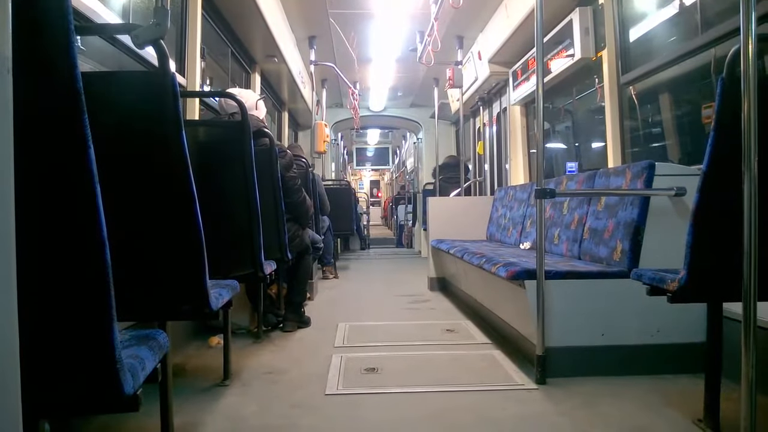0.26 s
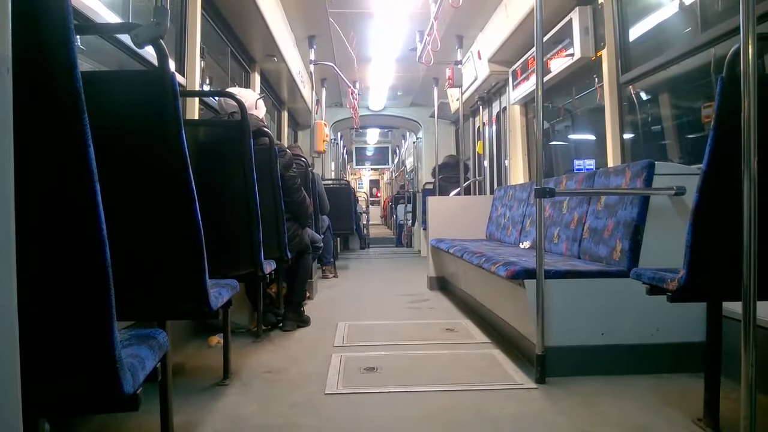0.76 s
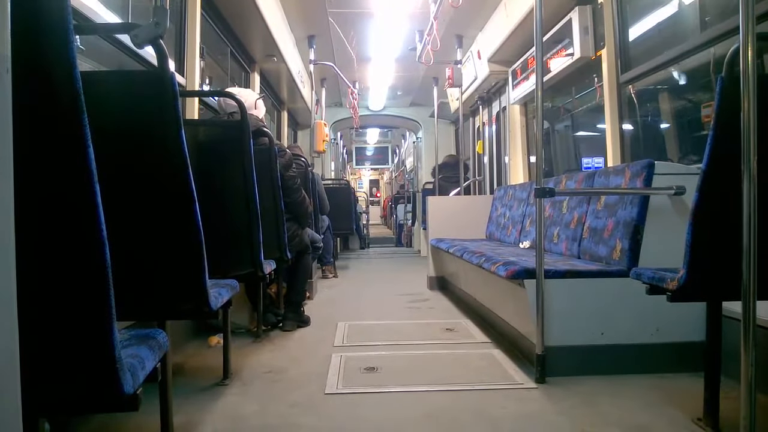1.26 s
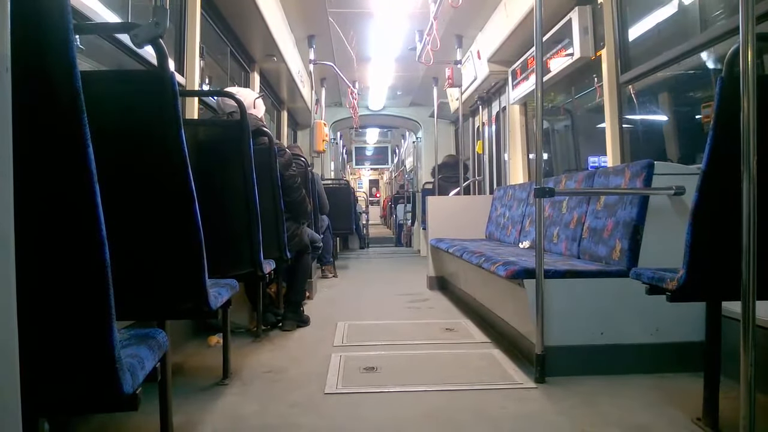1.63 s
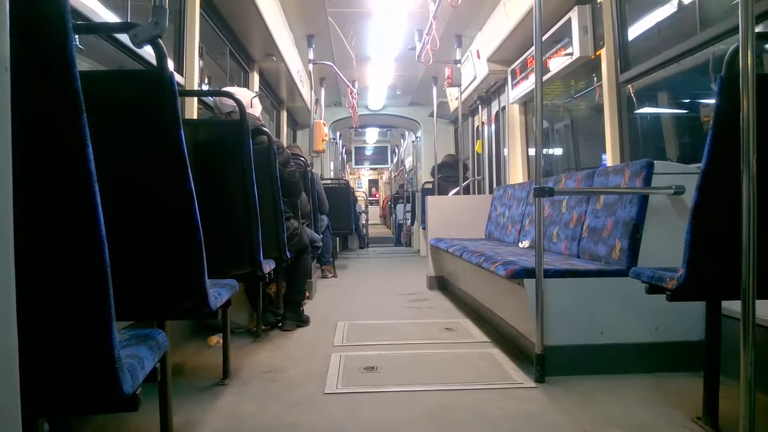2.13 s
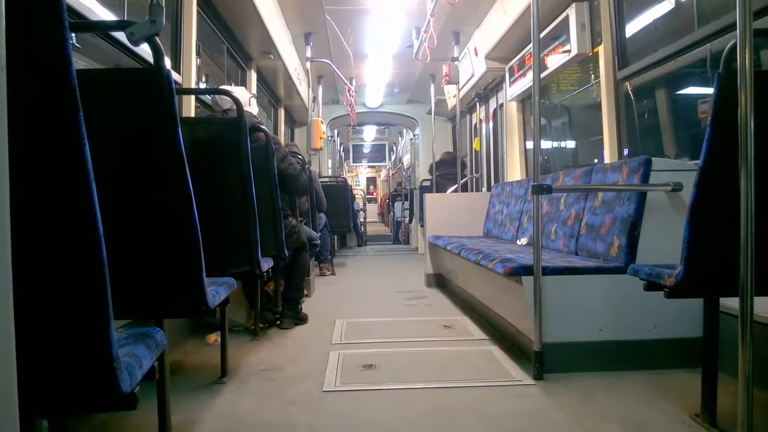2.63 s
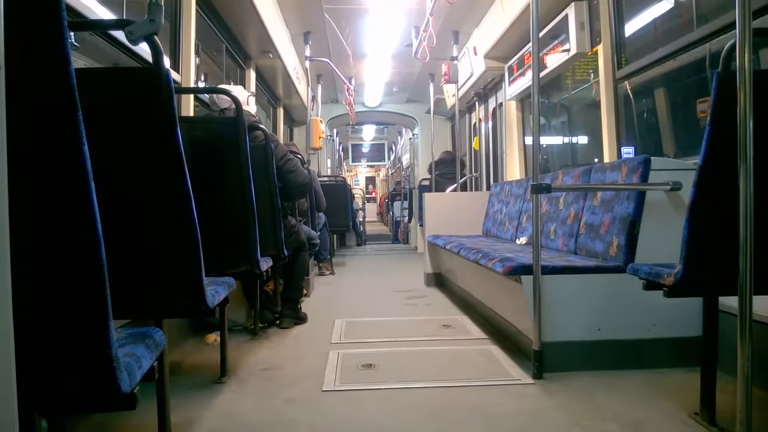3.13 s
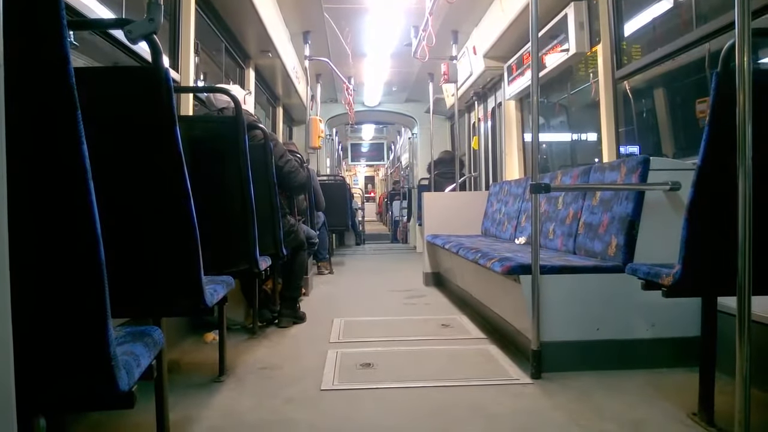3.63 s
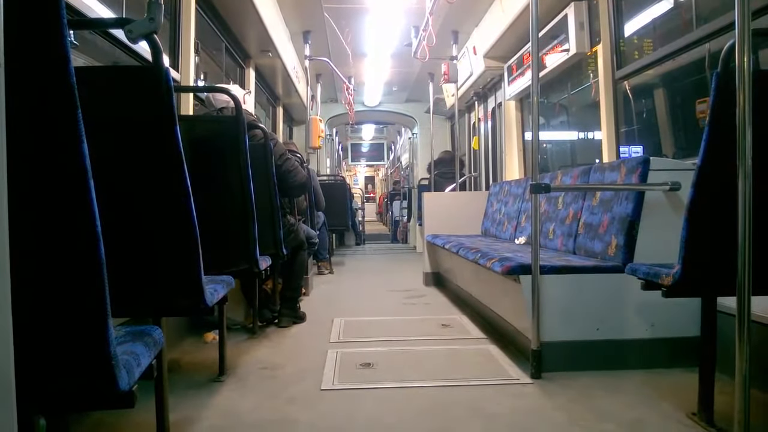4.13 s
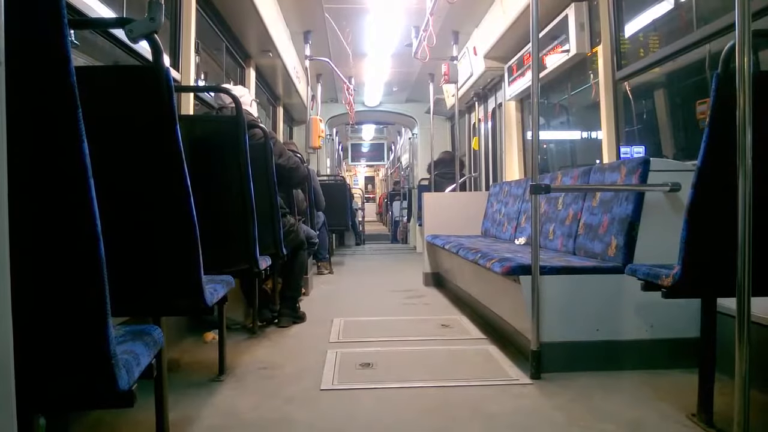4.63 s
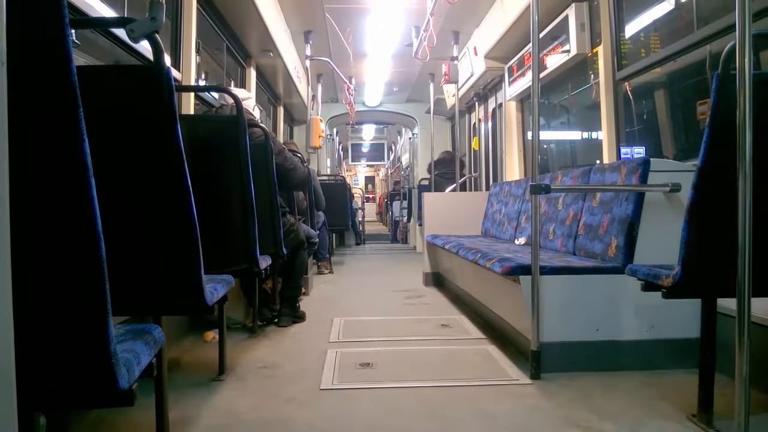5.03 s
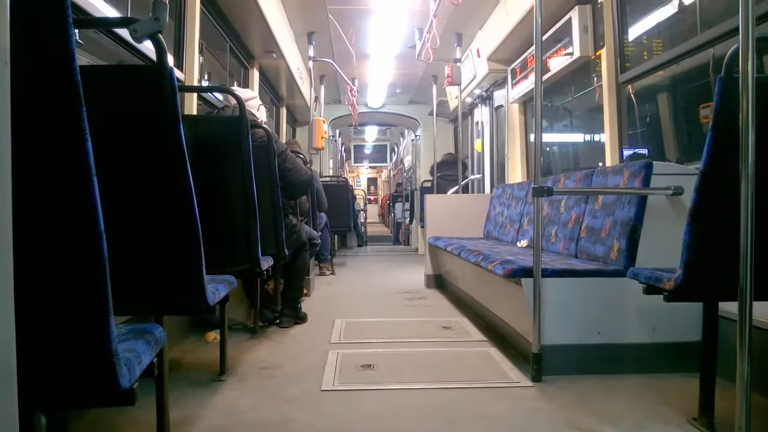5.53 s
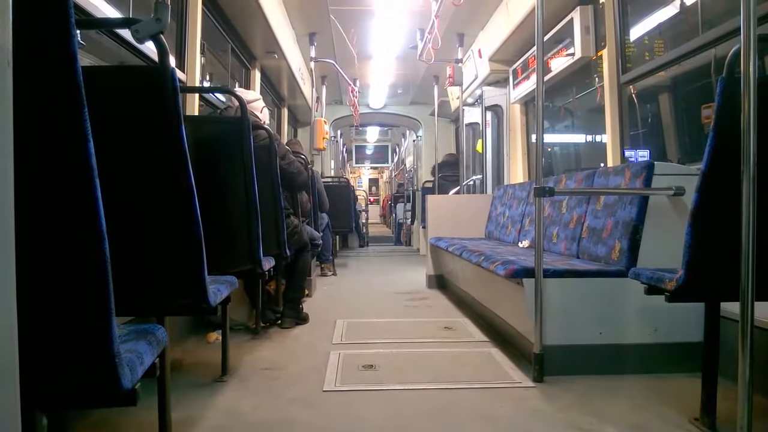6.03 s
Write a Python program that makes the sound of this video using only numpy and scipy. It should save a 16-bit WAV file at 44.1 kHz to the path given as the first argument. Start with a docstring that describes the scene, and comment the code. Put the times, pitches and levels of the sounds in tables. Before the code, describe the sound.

Inside a moving tram, wheels rumble and throb over a steady electric hum, then loose fittings clack and the floor thuds.

```python
"""Inside a slowing tram. From the start the wheels drum the car body and rumble on the rails, under
converter hum and motor whine. The drumming slows and dies away at a jolt near 2.6 s, just after a loose
part ticks. From 4.2 s the floor and seats thud harder and fittings clack more often on the right.
The brakes sing faintly; near 5 s a jolt brings the drumming back briefly and a panel groans once.
The rolling turns brighter, and more jolts and clacks close the scene."""
import sys
import numpy as np
from scipy import signal
from scipy.fft import rfft, irfft, next_fast_len
from scipy.io import wavfile
from scipy.ndimage import uniform_filter1d, map_coordinates

SR = 44100
rng = np.random.default_rng(int(sys.argv[2]) if len(sys.argv) > 2 else 0)


def wav_record(signal):
    """Record a signal, one row per channel, as 16-bit PCM in the file named by sys.argv[1]."""
    frames = np.transpose(np.atleast_2d(signal))
    bounded = np.clip(frames, -1, 1)
    # unit amplitude maps onto the largest positive 16-bit level
    quanta = np.round(bounded * 32767).astype(np.int16)
    wavfile.write(sys.argv[1], SR, quanta)


N = 276936
TIME = np.arange(N) / SR
PAD = 4096  # samples of room for filters to ring


# pace of the wheel bumps: (time [s], rate [Hz])
DRUM_PACE = [(0, 17.1), (1.5, 16.9), (2.6, 15.6), (4.9, 17.1)]
# fader of the drumming: (time [s], level [dB])
DRUM_FADER = [(0.0, -16.5), (0.35, -11), (0.639, -9), (1.05, -11), (1.75, -8.5), (2.25, -14), (2.699, -36),
              (2.85, -69), (4.93, -72), (5.07, -21.5), (5.28, -21), (5.5, -58.5)]
# its fixed harmonics: (multiple, gain [dB])
DRUM_HARMONICS = [(1, 0.5), (2, -16), (4, -28.5)]
# its third harmonic, fading early: (time [s], gain [dB])
DRUM_THIRD_FADER = [(0, -10.5), (0.65, -18), (0.9, -29)]

def body_drumming():
    """The car body drums once per wheel bump: a deep throb."""
    (hz,), (db,), (third_db,) = curves(DRUM_PACE), curves(DRUM_FADER), curves(DRUM_THIRD_FADER)
    return centred(amp(db) * harmonics(hz, DRUM_HARMONICS + [(3, third_db)]))


# bed of floor shake: (time [s], level [dB])
SHAKE_FADER = [(0, -28.5), (2, -25.5), (2.5, -18), (3.4, -27.5), (4.5, -32), (6.28, -37.5)]
# track jolts: (time [s], level [dB], hold [s])
TRACK_JOLTS = [(0, -16.5, 0.049), (2.62, -21, 0.34), (4.22, -30, 0.044), (4.74, -25.5, 0.028),
               (4.974, -16, 0.23), (5.421, -22, 0.2), (5.912, -24.5, 0.16)]
# sub-bass of the floor: (frequency [Hz], gain [dB])
FLOOR_EQ = [(7.6, -39.5), (13, 1), (18, 1.5), (26, -2), (36, 0.5), (56, -6), (80, -30), (112, -16.5),
            (140, -50), (240, -120)]

def floor_shake():
    """The floor shakes all along; each track jolt swells it, holds and dies away."""
    rise_s, t60_s = 0.019, 0.93
    power = amp(curves(SHAKE_FADER)[0]) ** 2
    for start, db, hold in TRACK_JOLTS:
        attack = np.clip((TIME - start) / rise_s + 1, 0, 1)
        power += (attack * amp(db - 60 * np.maximum(TIME - start - hold, 0) / t60_s)) ** 2
    return np.sqrt(power) * noise_bed(FLOOR_EQ, patchy_db=-1.5)


# two-band fader of the rolling: (time [s], bass gain [dB], treble gain [dB])
ROLL_FADERS = [(0.0, -30.5, -36.5), (1, -32, -36.5), (1.8, -29.5, -36), (2.2, -35.5, -38),
               (3.69, -36.5, -37.5), (4.6, -39, -33), (5.05, -34, -30.5), (5.3, -34, -26),
               (5.8, -32.5, -30), (6.28, -34.5, -29)]
# rumble of wheel on rail: (frequency [Hz], gain [dB])
RAIL_EQ = [(41, -24.5), (70, -3), (92, -13.5), (112, -13.5), (156, -4), (179, -15.5), (218, -9.5),
           (253, -18), (290, -14), (464, -19), (647, -26.5), (1130, -32.5), (1300, -35), (1460, -32),
           (1600, -42.5), (2600, -59.5), (5720, -120)]

def rolling():
    """Wheels rumble on the rails, bass and treble swelling separately."""
    crossover_hz = 234
    bass_db, treble_db = curves(ROLL_FADERS)
    wheels = noise_bed(RAIL_EQ, patchy_db=1.5)
    bass = filtered_bed(wheels, lambda f: 1 / (1 + (f / crossover_hz) ** 2))
    treble = wheels - bass
    return amp(bass_db + 0.3 * wobble(5.3)) * bass + amp(treble_db + 0.25 * wobble(5.0)) * treble


# bumps of the car body: (time [s], gain [dB], ring pitch [Hz], ring boost [dB])
THUD_CUES = [(0.438, -36.5, 464, 7), (0.691, -37, 334, 11.5), (1.625, -36.5, 477, 12.5),
             (2.605, -30.5, 470, 2), (2.645, -31.5, 740, 7), (2.691, -29.5, 200, 11.5),
             (3.216, -40.5, 294, 1.5), (3.605, -34.5, 450, 7), (4.061, -40, 404, 5), (4.316, -17, 330, 5.5),
             (4.34, -23, 920, 12), (4.612, -29, 296, 13.5), (5.045, -32, 610, -2), (5.44, -31, 440, 3),
             (5.57, -24, 201, 16), (5.669, -32, 960, 10.5)]
# dull tone of floor and seat shells: (frequency [Hz], gain [dB])
SHELL_EQ = [(120, -31.5), (200, -4.5), (270, -1), (400, -0.5), (610, -3.5), (690, -10), (1000, -12.5),
            (2000, -30.5), (4500, -97)]

def thuds():
    """Dull bumps come through floor and seats; the shells ring on their modes."""
    rise_s, hold_s = 0.0048, 0.017
    modes_hz, width_hz = [271, 389.6, 461, 570, 975], 22
    track = np.zeros((2, N + SR))
    for start, db, hz, ring_db in THUD_CUES:
        contacts = burst(rise_s, hold_s, kick=0.095)
        bump = struck(contacts, hold_s, SHELL_EQ, hz, ring_db, width_oct=0.37)
        track[:, round(start * SR):][:, :bump.shape[1]] += amp(db) * bump
    modes = lambda f: 1 + sum(1 / (1 + 2j * (f - hz) / width_hz) for hz in modes_hz)
    return amp(-2.5) * filtered(track, modes)[:, PAD:PAD + N]


# fitting hits: (time [s], gain [dB], hardness [dB/octave], ring pitch [Hz], ring boost [dB], hold [s])
CLACK_CUES = [(0.264, -61, -0.5, 3040, 2.5, 0.03), (0.552, -56, -8.5, 2030, 5, 0.071),
              (2.526, -60.5, 1, 3080, 7.5, 0.041), (2.594, -48, -4.5, 1840, 5.5, 0.078),
              (2.671, -57, -3.5, 2090, 7, 0.057), (3.275, -65, 0.5, 2400, 8, 0.01),
              (4.218, -56, 2.5, 2790, 7, 0.054), (4.242, -53, -6.5, 4430, 13, 0.033),
              (4.316, -30.5, 2, 2950, 7.5, 0.028), (4.368, -46, 4.5, 4400, 7.5, 0.05),
              (4.788, -64.5, 2.5, 3000, 6, 0.057), (4.872, -51, -10.5, 2250, 7, 0.083),
              (5.195, -62.5, 2, 3320, 8.5, 0.024), (5.324, -57.5, -1.5, 3420, 2, 0.031),
              (5.435, -49.5, -2, 1760, 11.5, 0.036), (5.528, -55.5, 7, 4820, -2, 0.034),
              (5.578, -43, 1.7, 3460, 7, 0.042), (5.647, -53.5, -1, 3400, 5.5, 0.053),
              (5.717, -49.5, -3, 3500, 4, 0.051), (5.856, -45, -11, 1760, 19, 0.058),
              (6.085, -62, 0.5, 3420, 4, 0.1)]
# metallic tone of poles and frames: (frequency [Hz], gain [dB])
FRAME_EQ = [(300, -76), (600, -15), (1000, -0.5), (1900, 0.5), (2500, -4), (3000, -2.5), (4000, -2),
            (4750, -5.5), (5100, -9.5), (5600, -13), (8000, -21), (12000, -29), (15500, -38.5)]

def clacks():
    """Loose fittings on the right rattle on poles and frames; harder hits are brighter and snappier."""
    track = np.zeros((2, N + SR))
    for start, db, hardness, hz, ring_db, hold in CLACK_CUES:
        rise_s = 0.14 * hold * amp(-0.52 * hardness)
        right, diffuse = burst(rise_s, hold, kick=0.85)
        left = 0.052 * right + 1.5 * diffuse  # both sides share a little direct sound
        metal = struck(np.array([left, right]), hold, FRAME_EQ, hz, ring_db,
                       width_oct=0.11, tilt_db=hardness)
        track[:, round(start * SR):][:, :metal.shape[1]] += amp(db) * metal
    return track[:, PAD:PAD + N] * amp([[-6], [6]])  # push to the right


# glides of the panel: (time [s], length [s], start pitch [Hz], end pitch [Hz], level [dB])
GROAN_CUES = [(5.196, 0.093, 327, 355.5, -31), (5.271, 0.12, 408, 395, -33)]

def panel_groan():
    """A panel under load groans once, in two overlapping glides."""
    return sum(rough_tone(*cue, scatter_hz=8.4) for cue in GROAN_CUES)


# tone of the hum: (multiple, gain [dB])
HUM_HARMONICS = [(1, 0), (2, -16), (3, -19)]

def converter_hum():
    """The converter's hum fades slowly and flutters with the body's drumming."""
    pitch_hz, start_db, fade_db_per_s, flutter_depth = 151.2, -38, 0.7, 1.4
    (rate,), (drum_db,) = curves(DRUM_PACE), curves(DRUM_FADER)
    gain = amp(start_db - fade_db_per_s * TIME + 1.6 * wobble(8))
    hum = harmonics(pitch_hz + 0.36 * wobble(4.01), HUM_HARMONICS)
    flutter = 1 + flutter_depth * amp(drum_db) * harmonics(rate)
    return centred(gain * hum * flutter)


# brake notes: (time [s], length [s], start pitch [Hz], end pitch [Hz], level [dB])
BRAKE_CUES = [(4.607, 0.16, 790, 787, -51), (4.876, 0.58, 768.5, 765, -48.5),
              (5.144, 0.12, 1030, 1040, -47.5)]

def brakes():
    """The brakes sing faintly."""
    return sum(rough_tone(*cue, scatter_hz=17) for cue in BRAKE_CUES)


# fan and motor bands: (centre [Hz], width [Hz], gain [dB])
WHINE_BANDS = [(1128, 46, -2), (1416, 18, 0.5), (1496, 37, 0), (2355, 150, -15), (4240, 69, -18.5)]

def whines():
    """Fans and motors whine in fuzzy, narrow bands of noise."""
    bands = lambda f: sum(amp(db) * np.exp(-((f - hz) / width) ** 2) for hz, width, db in WHINE_BANDS)
    return amp(-58 + 0.81 * wobble(9.7)) * unit(filtered(rng.standard_normal((2, N)), bands))


# faint ticks: (time [s], level [dB])
TICK_CUES = [(2.2244, -63), (2.2667, -61), (2.3421, -57)]

def ticks():
    """A loose part clicks lightly against the frame."""
    t60_s = 0.09
    gain = sum((TIME >= s) * amp(db - 60 * np.maximum(TIME - s, 0) / t60_s) for s, db in TICK_CUES)
    thin_metal = lambda f: amp(along(FRAME_EQ, f)) * f / (f + 4000)
    return gain * unit(filtered(rng.standard_normal((2, N)), thin_metal))


# airy top end: (frequency [Hz], gain [dB])
HISS_EQ = [(940, -36.5), (1600, 4.5), (2360, -11), (3230, -8.5), (5830, -15.5), (8050, -18.5),
           (11700, -23.5), (15500, -55.5)]

def hiss():
    """A soft hiss rides up and down with the treble of the rolling."""
    _, treble_db = curves(ROLL_FADERS)
    level_db = -61 + 0.64 * (treble_db - treble_db.mean()) + 0.31 * wobble(2.3)
    return amp(level_db) * noise_bed(HISS_EQ, patchy_db=2.5)


# tone of the switching: (multiple, gain [dB])
SWITCHING_HARMONICS = [(1, 1.5), (2, -3.5), (3, -6)]

def drive_switching():
    """The drive's thin switching tone fades once the drive eases off."""
    pitch_hz, start_db, ease_off_s, fade_db_per_s = 3910, -76, 1.8, 8
    (rate,) = curves(DRUM_PACE)
    buzz_db = 3.2 * harmonics(2 * rate)  # the motor current pulses twice a turn
    level_db = start_db - fade_db_per_s * np.maximum(TIME - ease_off_s, 0)
    gain = amp(level_db + buzz_db + 3 * wobble(30))
    return centred(gain * harmonics(pitch_hz + 25 * wobble(200), SWITCHING_HARMONICS))


# whistles: (time [s], length [s], start pitch [Hz], end pitch [Hz], level [dB])
HIGH_WHISTLE_CUES = [(3.35, 0.15, 7980, 8130, -79), (3.7, 0.06, 11350, 11300, -77)]

def high_whistles():
    """Two very faint, thin, high whistles."""
    return sum(rough_tone(*cue, scatter_hz=17) for cue in HIGH_WHISTLE_CUES)


# cabin echo: (frequency [Hz], time to fall 60 dB [s])
CABIN_DECAY = [(300, 0.38), (3800, 0.38), (6000, 0.19), (12000, 0.14)]

def burst(rise_s, hold_s, kick):
    """Contacts smeared by the cabin's echo: two noises after PAD silent samples; kick adds punch."""
    size = SR // 2
    hz, frame_s, bands = signal.stft(rng.standard_normal((2, size)), SR, nperseg=256)
    after = np.maximum(frame_s - hold_s, 0)  # the decay starts when the rattling stops
    decay = amp(-60 * after / along(CABIN_DECAY, hz)[:, None])
    tail = signal.istft(bands * decay, SR, nperseg=256)[1][:, :size]
    t = np.arange(size) / SR
    attack = (1 - np.exp(-t / rise_s)) * (1 + kick * np.exp(-t / 0.019))
    return np.pad(tail * attack, [(0, 0), (PAD, 0)])


# stereo focus: (frequency [Hz], left-right likeness [0 to 1])
STEREO_FOCUS = [(30, 1), (290, 0.98), (640, 0.84), (900, 0.21), (1410, 0.52), (3100, 0.24), (6820, 0.13),
                (15000, 0.28)]
# balance: (frequency [Hz], left over right [dB])
STEREO_BALANCE = [(17, 4.5), (35, 2.5), (150, 1.5), (300, 1.5), (550, -3), (1100, 5), (2380, -3.5),
                  (5000, -4), (12000, 1)]
# phase offset: (frequency [Hz], left lead [rad])
STEREO_PHASE = [(17, -.37), (80, -.19), (240, -.12), (330, -.15), (580, -.44), (720, .45), (900, -.1),
                (1150, 1.6), (1500, 2.7), (2300, 5.5)]

def cabin_stereo(mid_side):
    """Spreads a mid/side pair to left and right, band by band, as the cabin does."""
    def matrix(hz):
        width = np.arccos(np.clip(along(STEREO_FOCUS, hz), 0, 1)) / 2
        mid, side = np.cos(width), np.sin(width)
        lean = amp(along(STEREO_BALANCE, hz) / 2) * np.exp(.5j * along(STEREO_PHASE, hz))
        return np.array([[mid * lean, side * lean], [mid / lean, -side / lean]])
    return filtered_bed(mid_side, matrix).sum(axis=1)


def struck(contacts, hold_s, eq, ring_hz, ring_db, width_oct, tilt_db=0):
    """A burst through a body with one resonance, which fades once the contacts stop."""
    def response(f):
        octaves = lambda centre: np.log2((f + 1) / centre)
        body = amp(along(eq, f) + tilt_db * octaves(3000))
        boost = amp(ring_db * np.exp(-(octaves(ring_hz) / width_oct) ** 2))
        rms = np.sqrt(np.mean((body * boost) ** 2))
        return np.array([body, body * (boost - 1)])[:, None] / rms
    ring_decay_s = 0.075
    plain, ring = filtered(contacts, response)
    after = np.maximum((np.arange(contacts.shape[1]) - PAD) / SR - hold_s, 0)
    return plain + ring * np.exp(-after / ring_decay_s)


def rough_tone(start, length, first_hz, last_hz, db, scatter_hz):
    """A short, centred glide, unsteady in pitch and strength."""
    fade_db, fade_s = 14.5, 0.043  # slope of the fade in and out
    outside = np.maximum(np.maximum(start - TIME, TIME - start - length), 0)
    hz = np.interp(TIME, [start, start + length], [first_hz, last_hz]) + scatter_hz * wobble(70)
    return centred(amp(db - fade_db * outside / fade_s + 2.3 * wobble(45)) * harmonics(hz))


def noise_bed(eq, patchy_db):
    """A mid/side pair of shaped noises, rms 1, with patches of random gain."""
    bands = signal.stft(rng.standard_normal((2, N)), nperseg=512)[2]
    patches = uniform_filter1d(rng.standard_normal(bands.shape[1:]), size=5, axis=0)
    patches = unit(uniform_filter1d(patches, size=12, axis=1))
    pair = signal.istft(bands * amp(patchy_db * patches), nperseg=512)[1][:, :N]
    return unit(filtered(pair, lambda hz: amp(along(eq, hz))))


def harmonics(hz, partials=((1, 0),)):
    """Sines on multiples of a moving pitch, each of rms 1 at 0 dB."""
    phase = 2 * np.pi * np.cumsum(hz) / SR
    return np.sqrt(2) * sum(amp(db) * np.sin(k * phase + rng.uniform(0, 2 * np.pi)) for k, db in partials)


def centred(x):
    """A mid/side pair with a silent side."""
    return x * [[1], [0]]


def amp(db):
    """Decibels to gain."""
    return 10 ** (np.asarray(db) / 20)


def unit(x):
    """Scaled to rms 1."""
    return x / np.sqrt(np.mean(x ** 2) + 1e-20)


def along(points, hz):
    """Reads (frequency, value) points on a log axis."""
    f, values = np.transpose(points)
    return np.interp(np.log(hz + 1), np.log(f + 1), values)


def curves(rows):
    """One automation curve for each column after the time."""
    times, *columns = np.transpose(rows)
    return [np.interp(TIME, times, column) for column in columns]


def wobble(rate):
    """A smooth random curve, rate knots a second."""
    s = np.arange(0, N / SR + .01, .002)
    knots = rng.standard_normal(int(s[-1] * rate) + 4)
    return np.interp(TIME, s, map_coordinates(knots, [s * rate]))


def filtered(x, response):
    """x through a complex frequency response."""
    size = next_fast_len(x.shape[-1] + 2 * PAD)
    return irfft(rfft(x, size) * response(np.fft.rfftfreq(size, 1 / SR)), size)[..., :x.shape[-1]]


def filtered_bed(x, response):
    """Filters a sound as if it ran on past both ends."""
    pad = [(0, 0)] * (x.ndim - 1) + [(PAD, PAD)]
    return filtered(np.pad(x, pad, mode="reflect", reflect_type="odd"), response)[..., PAD:-PAD]


def scene():
    """Running gear, electrics and accents fill the cabin; the clacks sit on the right."""
    running_gear = body_drumming() + floor_shake() + rolling() + hiss()
    electrics = converter_hum() + whines() + drive_switching()
    accents = panel_groan() + brakes() + high_whistles() + thuds() + ticks()
    return cabin_stereo(running_gear + electrics + accents) + clacks()


def record(dry):
    """Rounds off the highest peaks, fades both ends and cuts the very top."""
    ceiling, fade_s, top_hz = 0.95, 0.004, 15741
    rounded = dry / (1 + np.abs(dry / ceiling) ** 8) ** (1 / 8)
    ramp = np.minimum(np.minimum(TIME, TIME[::-1]) / fade_s, 1)
    return filtered(rounded * np.sin(np.pi / 2 * ramp) ** 2, lambda hz: hz < top_hz)


dry = scene()
out = record(dry)
wav_record(out)
```